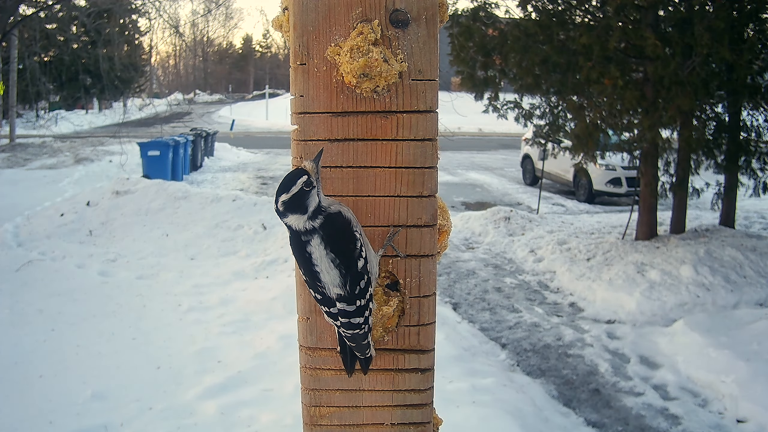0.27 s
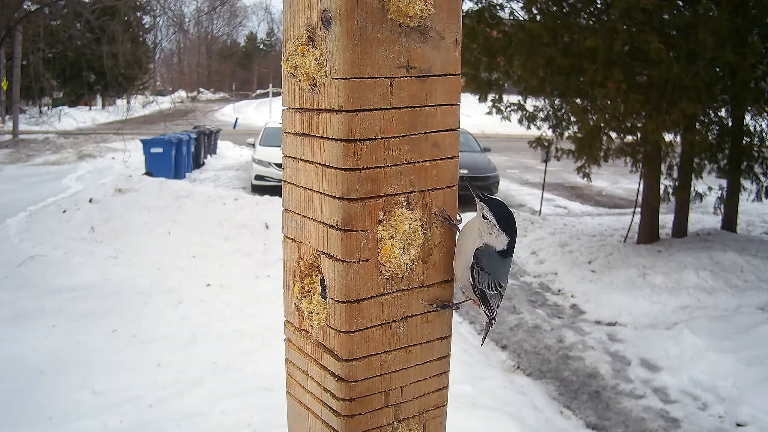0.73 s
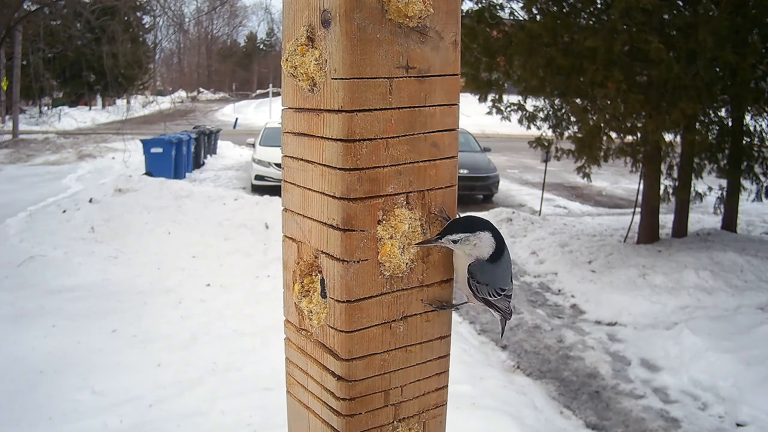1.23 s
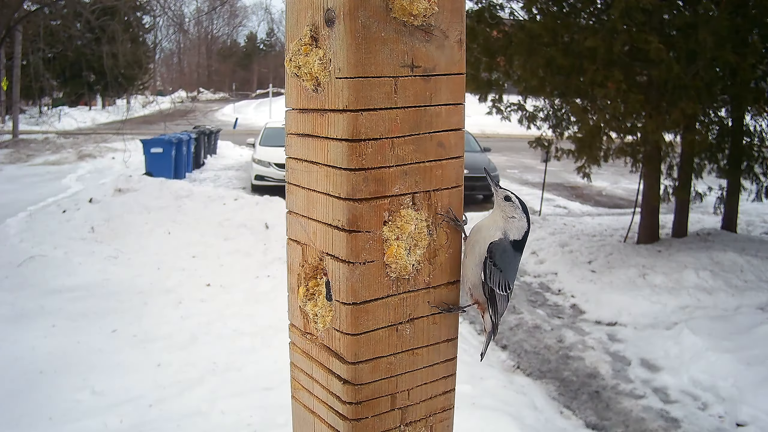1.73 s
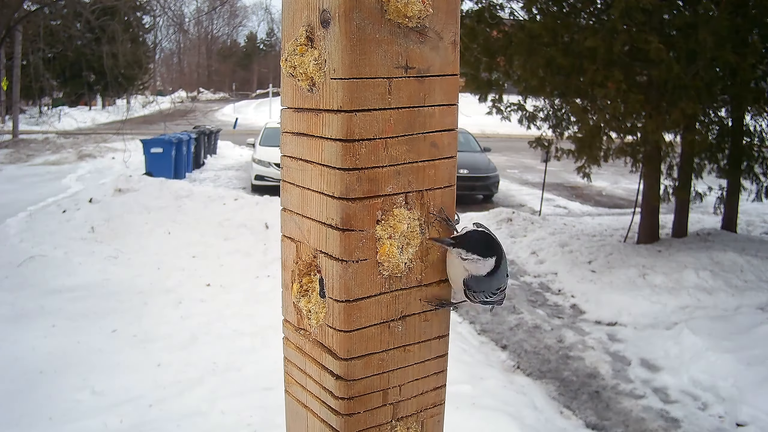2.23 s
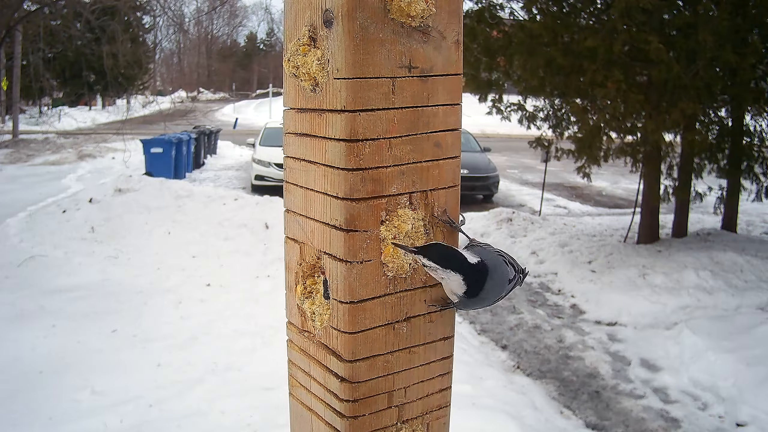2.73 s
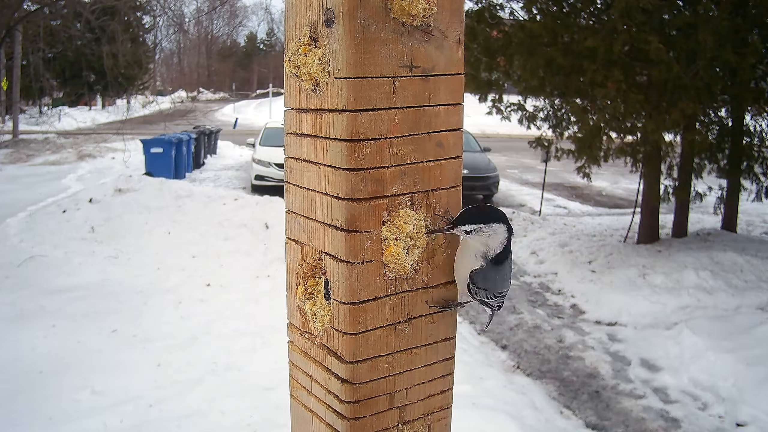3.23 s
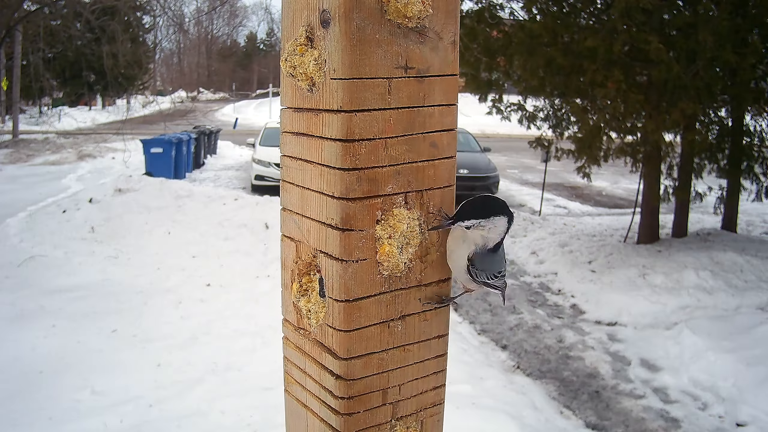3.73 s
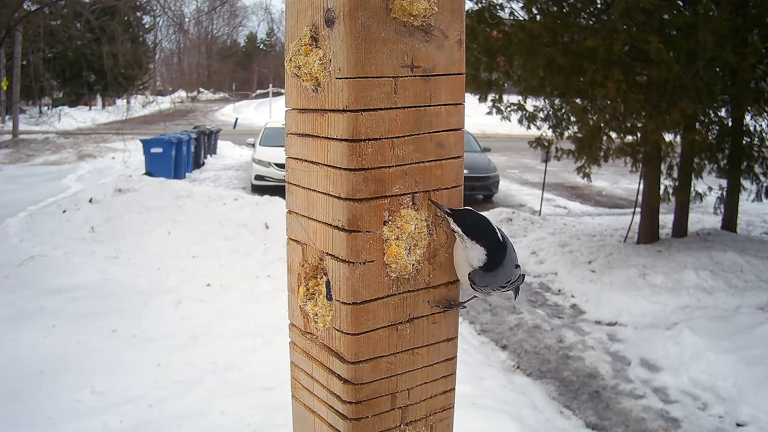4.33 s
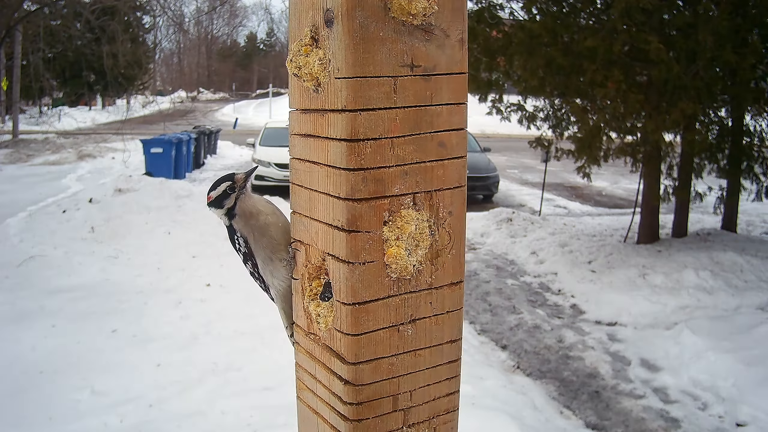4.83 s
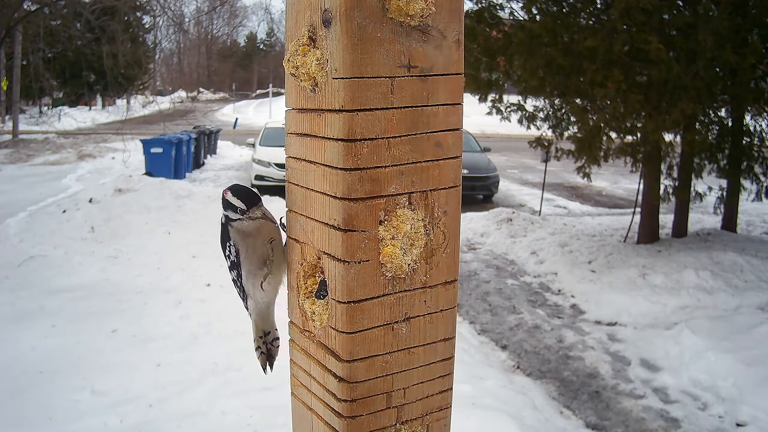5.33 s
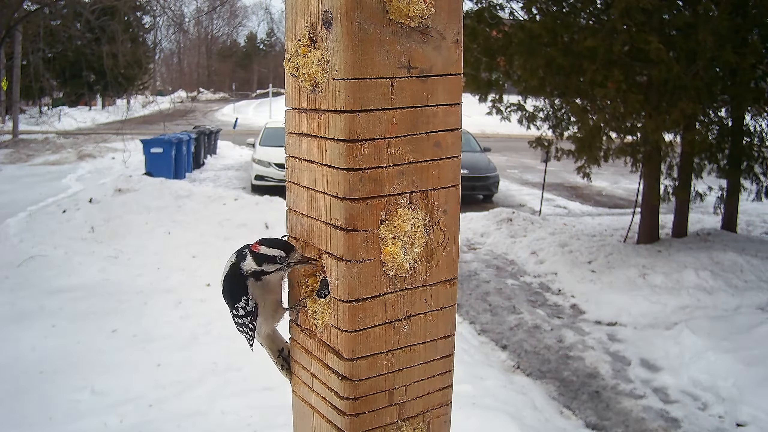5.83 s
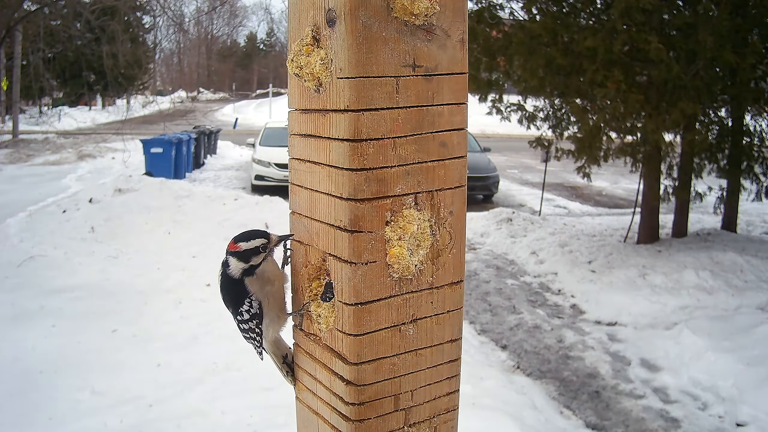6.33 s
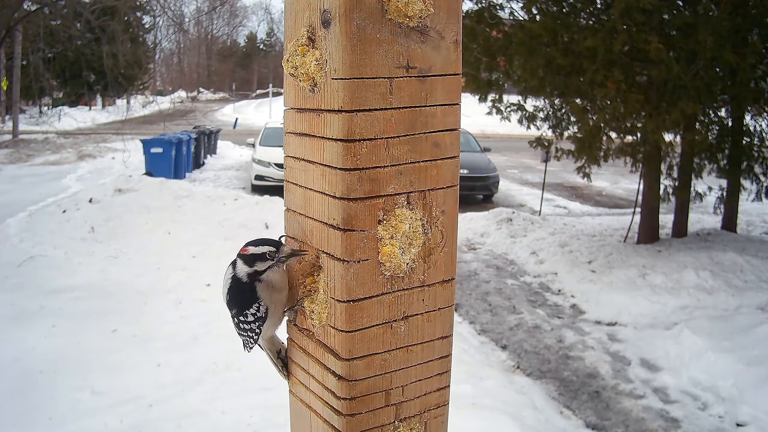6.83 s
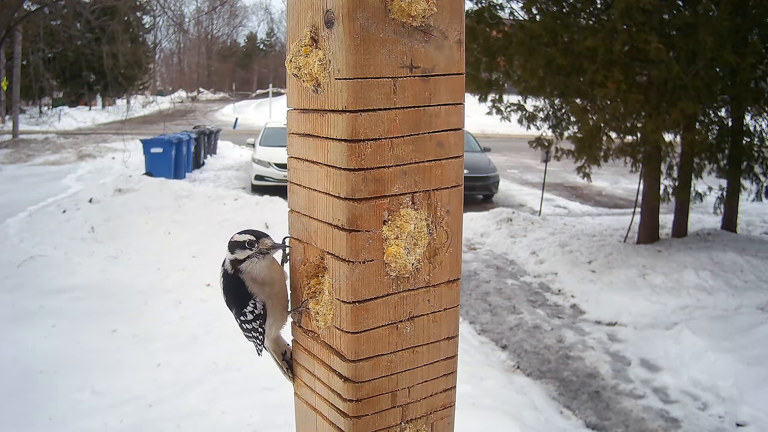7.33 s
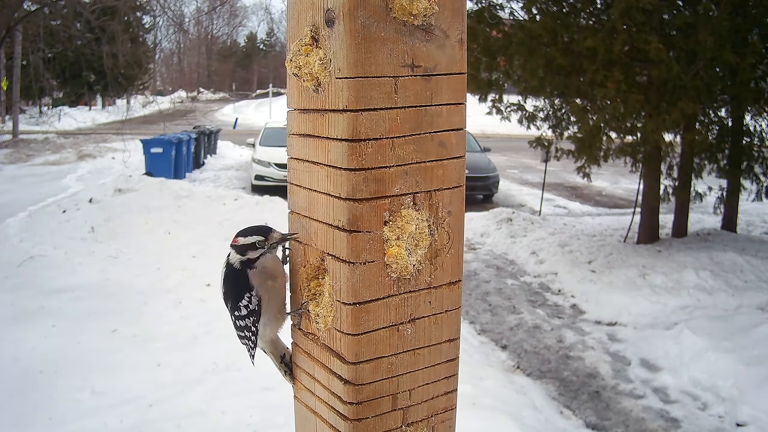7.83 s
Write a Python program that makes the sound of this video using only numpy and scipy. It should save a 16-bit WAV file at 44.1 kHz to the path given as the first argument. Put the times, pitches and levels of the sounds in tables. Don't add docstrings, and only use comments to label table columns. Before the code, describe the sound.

Near a wooden suet feeder, quiet hiss is cut by a momentary fade and abrupt restart. Neighbouring birds chip, call nasally, twitter and rasp faintly. Then one bird pecks: a weak tap, a pause, and a quick uneven run of hard hollow knocks with cracking attacks and short resonance. The feeder trembles softly. Claws scratch, a distant hoot and high chip sound, then suet tears sharply. Dry, close, centred sound.

```python
import sys
import numpy as np
from scipy import signal
from scipy.fft import rfft, irfft, next_fast_len
from scipy.io import wavfile

SR = 44100
rng = np.random.default_rng(int(sys.argv[2]) if len(sys.argv) > 2 else 0)


def inscribe(sig):
    pcm = np.round(np.clip(np.atleast_2d(sig).T, -1, 1) * 32767)
    wavfile.write(sys.argv[1], SR, pcm.astype(np.int16))


def gain_from_decibels(decibels):
    exponent = np.asarray(decibels, float) / 20
    return 10 ** exponent


N = 356813


def band(x, hz, width):
    return signal.lfilter(*signal.iirpeak(hz, hz / width, fs=SR), x)


def noise(hz, width, size=N):
    x = band(rng.standard_normal(size + 2000), hz, width)[2000:]
    return x / np.std(x)


def add(out, s, x):
    i = int(s * SR)
    out[i:i + len(x)] += x[:N - i]


def ring(modes, t, detune, lag=0, step=0):
    hz, db, t60, rise = (c[:, None] for c in np.transpose(modes))
    late = np.maximum(t - lag, 0)
    swell = (1 - np.exp(-late / rise)) ** 2
    fade = 1000 ** (-late / t60)
    tone = np.sin(2 * np.pi * hz * detune * (t - step))
    return np.sum(gain_from_decibels(db) * swell * fade * tone, axis=0)


# f/Hz, level/dB, t60/s, build-up/s
DEEP = [(520, -30.5, 0.082, 0.0021), (703, -16, 0.13, 0.0092), (815, 0, 0.12, .0026)]
# f/Hz, level/dB, t60/s, build-up/s
HOLLOW = [(939, 1.5, 0.069, 0.0018), (1020, -38, 0.056, .0015)]
# f/Hz, level/dB, t60/s, build-up/s
SIDE = [(1050, 2.5, 0.045, 0.0019), (1123, 2, 0.057, 0.0013), (1221, -2, 0.078, 0.0017),
        (1332, -1, 0.12, .002)]
# f/Hz, level/dB, t60/s, build-up/s
MIDDLE = [(1682, -7, 0.041, 0.0018), (1731, 5, 0.036, 0.00174), (1947, -10.5, 0.057, 0.0016)]
# f/Hz, level/dB, t60/s, build-up/s
KNOCK = [(2237, -1.5, 0.04, 0.0014), (2350, 4, 0.015, .0012), (2580, -4.5, 0.029, 0.0012)]
# f/Hz, level/dB, t60/s, build-up/s
EDGE = [(2830, 3, 0.023, 0.00032), (3100, -13, 0.039, 0.00083), (3350, -12.5, 0.022, 0.00087)]
# f/Hz, level/dB, t60/s, build-up/s
SHELL = [(4300, -8, 0.011, .0006), (5050, 1, 0.014, 0.00038), (5850, -3, 0.01, 0.00053)]
# f/Hz, level/dB, t60/s, build-up/s
HOOK = [(13100, -4, .035, .001), (13900, 5, .035, .001), (14300, 0, .045, .002), (15120, 2, 0.09, .004),
        (15260, -2, .07, .004)]
# f/Hz, level/dB, t60/s, build-up/s
CRACK = [(7330, 4.5, 0.0059, 0.00037), (7500, -31, .04, 0.0011), (8300, -4.5, 0.0073, 0.00037),
         (6000, -18, 0.0069, .0004)]
# level over force/dB, then dB gained per dB of middle, knock and crack
FOLLOWERS = [
    (-4, -0.08, 0.11, -0.18),
    (-22.5, -0.22, -0.084, -0.27),
    (-6.5, 0.44, 0.5, 0.12),
    (-14.5, 0.4, 0.58, 0.52),
    (-29.8, .15, .22, -.09),
    (-18, -.34, -0.0078, 0.65),
]
DEEP_LAG_S, HOLLOW_LAG_S = 0.0031, 0.0033
IN_STEP_S = 0.01
CREST_SOFT_S, CREST_HARD_S = 0.0028, 0.000824
HARD_DB, HARD_SPAN_DB = -3.5, 2.5
TAIL_DB, TAIL_T60_S, CLICK_T60_S = -19, 0.17, 0.014


def peck(force_db, mix):
    t = np.arange(int(0.3 * SR)) / SR
    middle_db, knock_db, crack_db = force_db + np.array(mix)
    levels = [force_db + db + np.dot(shares, mix) for db, *shares in FOLLOWERS]
    hollow_db, side_db, edge_db, shell_db, hook_db, click_db = levels
    softness = 1 / (1 + np.exp((mix[2] - HARD_DB) / HARD_SPAN_DB))
    crest_s = CREST_HARD_S + (CREST_SOFT_S - CREST_HARD_S) * softness
    detune = 1 + 0.003 * rng.standard_normal()

    blow = gain_from_decibels(force_db) * ring(DEEP, t, detune, DEEP_LAG_S, IN_STEP_S)
    blow += gain_from_decibels(hollow_db) * ring(HOLLOW, t, detune, HOLLOW_LAG_S, IN_STEP_S)
    blow += gain_from_decibels(side_db) * ring(SIDE, t, detune, HOLLOW_LAG_S)
    blow += gain_from_decibels(middle_db) * ring(MIDDLE, t, detune, 0, crest_s)
    blow += gain_from_decibels(knock_db) * ring(KNOCK, t, detune, 0, crest_s)
    blow += gain_from_decibels(edge_db) * ring(EDGE, t, detune, 0, crest_s)
    blow += gain_from_decibels(shell_db) * ring(SHELL, t, detune, 0, crest_s)
    blow += gain_from_decibels(hook_db) * ring(HOOK, t, detune, 0, crest_s)
    blow += gain_from_decibels(crack_db) * ring(CRACK, t, detune)
    blow += gain_from_decibels(click_db) * 1000 ** (-t / CLICK_T60_S) * noise(10000, 12000, size=len(t))
    woody = band(band(noise(1440, 1900, size=len(t)), 1700, 4200), 1740, 3800)
    return blow + gain_from_decibels(knock_db + TAIL_DB) * 1000 ** (-t / TAIL_T60_S) * woody


SMEAR_DB, SMEAR_S = -31.5, 0.034


def smear(blow):
    spread = np.hanning(int(2 * SMEAR_S * SR))
    spread = spread * rng.standard_normal(len(spread))
    return gain_from_decibels(SMEAR_DB) * np.convolve(blow[:160], spread) / 10


# t/s, force level/dB, then level over force/dB of the middle notes, bare-wood knock and crack
PECKS = [(2.797, -41, -14, -15.5, -10), (3.3803, -34, -23, 4.5, -5), (3.5614, -31.5, -6.5, -14, -6.5),
         (3.6958, -29.5, -6.5, -9.5, 0), (3.8478, -20.5, -7.5, -7.5, -7.5), (4.0148, -18.5, -3.5, 0, -8.5),
         (4.2384, -19, -1.5, 2, -27), (4.6430, -24, 2.5, 6, 10)]


def pecks():
    out = np.zeros(N)
    for s, force_db, *mix in PECKS:
        blow = peck(force_db, mix)
        add(out, s, blow)
        add(out, s - SMEAR_S, smear(blow))
    return out


def wobble(hz, width):
    z = signal.hilbert(band(noise(hz, width), hz, width), next_fast_len(N))[:N]
    x = (z / np.abs(z) ** 0.7).real
    return x / np.std(x)


# f/Hz, width/Hz, level/dB, share of the buzz, ring-out t60/s
MOUNT_LINES = [(25, 5, -17, .01, .2), (53.7, 3.2, .1, .01, 0.23), (77.8, 5, -12, .01, .2),
               (106, 4, -7, 0.31, .6), (164, 7.8, -0.6, .99, 0.24), (243, 13, -19, 0.85, .25),
               (288, 24, -18.5, .99, .25), (333, 7, -11, .99, .2)]
# t/s, length/s, level/dB, buzz level of the upper lines/dB
JOLTS = [(.82, 0.092, -80, -10), (0.998, .07, -77, -10), (1.19, .08, -77, -12), (1.35, .1, -81, -20),
         (2.82, .09, -65, -11.5), (2.95, .07, -65.5, -16), (3.12, 0.22, -78.5, -9), (3.38, 0.16, -61, -6.5),
         (3.555, 0.24, -59, -1.5), (3.82, .24, -56, -4.5), (4.12, .11, -61, -14), (4.255, 0.093, -63.5, -3),
         (4.374, .16, -61, -21), (4.643, 0.11, -60, -9), (4.98, .08, -84, -12), (5.73, .11, -67.5, -5.5),
         (5.87, .08, -71, -10), (6.02, .08, -71.5, -9), (6.2, .1, -75, -9), (6.59, .15, -66, -10.5),
         (6.947, .14, -74.5, -12), (7.154, 0.083, -74, -18), (7.34, .08, -77, -12),
         (7.658, 0.24, -68.5, -9), (8.0, .09, -77, -12)]
JOLT_RISE_S, REST_DB = 0.06, -93.5


def mount():
    t, slow = np.arange(N) / SR, np.arange(0, N / SR + 0.01, 0.002)
    start, length, jolt_db, buzz_db = (c[:, None] for c in np.transpose(JOLTS))
    rise = np.sin(np.pi / 2 * np.clip((slow - start) / JOLT_RISE_S + 0.37, 0, 1)) ** 2
    since_end = np.maximum(slow - start - length, 0)
    out = np.zeros(N)
    for hz, width, db, share, t60 in MOUNT_LINES:
        shape = rise * 1000 ** (-since_end / t60)
        shaking = np.sum((gain_from_decibels(jolt_db + share * buzz_db) * shape) ** 2, axis=0)
        gain = np.sqrt(gain_from_decibels(REST_DB) ** 2 + shaking)
        out += gain_from_decibels(db) * np.interp(t, slow, gain) * wobble(hz, width)
    return out


def scratch(out, s, db, hz, width, length):
    t = np.arange(-8000, 8000) / SR
    grain = band(noise(hz, width, size=len(t)), hz, 2 * width)
    add(out, s + t[0], gain_from_decibels(db - 3.5) * np.exp(-(t / length) ** 2 * 2) * grain)


# t/s, snap level/dB, squeak level/dB
TEARS = [(7.3478, -40, -52.5), (7.367, -60, -55), (7.3862, -43, -60), (7.3882, -32, -46)]


def suet():
    out = np.zeros(N)
    for s, snap_db, squeak_db in TEARS:
        scratch(out, s, snap_db, hz=11000, width=8000, length=0.00046)
        scratch(out, s, squeak_db, hz=3590, width=230, length=0.0086)
    return out


# t/s, peak level/dB, f/Hz
CLAWS = [(.736, -49, 9000), (.88, -52, 10000), (1.116, -50, 10500), (2.126, -50, 9000), (2.951, -49, 13500),
         (2.952, -51, 7000), (2.98, -51, 9500), (3.132, -50, 9000), (4.139, -49, 9000),
         (4.818, -48.5, 6500), (5.675, -52, 8500), (6.279, -48, 9500), (6.684, -47.5, 9000)]
# t/s, peak level/dB
SMALL_TICKS = [(2.131, -56), (3.134, -52), (3.383, -48), (3.564, -48), (5.678, -58)]


def claws():
    out = np.zeros(N)
    for s, db, hz in CLAWS:
        scratch(out, s, db, hz, width=0.39 * hz, length=0.0026)
    for s, db in SMALL_TICKS:
        scratch(out, s, db, hz=5000, width=600, length=0.0047)
    return out


# t/s, peak level/dB, f/Hz, width/Hz, length/s
RUSTLES = [(.787, -55, 4000, 5000, .03), (4.658, -54.5, 310, 90, .018), (6.26, -53, 5000, 5000, .035),
           (7.33, -59, 12000, 600, .01), (7.385, -51.5, 1500, 1500, .01),
           (7.3878, -33, 11000, 1800, 0.0032), (7.39, -53.5, 7000, 9000, .027), (7.401, -57, 800, 300, .02),
           (7.407, -53.5, 10500, 2500, .027), (7.663, -56, 6000, 9000, .02), (7.669, -60, 750, 300, .024)]


def rustles():
    out = np.zeros(N)
    for rustle in RUSTLES:
        scratch(out, *rustle)
    return out


# t/s, f/Hz
YANK_HZ = [(1.09, 735), (1.105, 759), (1.115, 803), (1.125, 846), (1.14, 815)]
# multiple of the pitch, rms level/dB, loudest at t/s, spread/s
YANK = [(1, -40.5, 1.128, .0053), (2, -33.5, 1.117, 0.008), (3, -36, 1.114, .0084),
        (4, -36.5, 1.111, .0084), (5, -47, 1.109, .005), (6, -51.5, 1.12, .006), (7, -50, 1.111, .005),
        (8, -53, 1.111, .005), (10, -69, 1.106, .006), (12, -65, 1.11, .0067)]
YANK_BREATH_DB, YANK_CUT = -54, 0.67


def yank():
    t = np.arange(N) / SR
    phase = 2 * np.pi * np.cumsum(np.interp(t, *np.transpose(YANK_HZ))) / SR

    def swell(s, spread):
        return np.exp(-((t - s) / np.where(t < s, spread, YANK_CUT * spread)) ** 2 / 2)

    tone = np.zeros(N)
    for k, db, s, spread in YANK:
        tone += gain_from_decibels(db + 3) * swell(s + 0.0017, spread) * np.sin(k * phase)
    breath = (1 + np.sin(phase)) * (noise(9000, 12000) + noise(2000, 2000))
    return tone + gain_from_decibels(YANK_BREATH_DB) * swell(1.116, 0.015) * breath


UPPER_VOICE = 1.155
UPPER_GROWTH = 1.4


def whistles(notes, waver, flutter, breath_db, upper_db):
    out, loudest_db = np.zeros(N), max(note[-1] for note in notes)
    for s, length, hz0, hz1, db in notes:
        u = np.linspace(0, 1, int(length * SR))
        pitch_shake, level_shake = [band(noise(106, 120, size=len(u)), 110, 160) for _ in range(2)]
        glide = hz0 + (hz1 - hz0) * np.sqrt(u)
        phase = 2 * np.pi * np.cumsum(glide * (1 + waver * pitch_shake)) / SR
        upper = gain_from_decibels(upper_db + UPPER_GROWTH * (db - loudest_db)) * np.sin(UPPER_VOICE * phase[-1] * u)
        tone = np.sin(phase) + upper
        breath = gain_from_decibels(breath_db) * noise(0.93 * hz0, 0.43 * hz0, size=len(u))
        add(out, s, gain_from_decibels(db + 2) * np.sin(np.pi * u) ** 1.3 * ((1 + flutter * level_shake) * tone + breath))
    return out


# t/s, length/s, first f/Hz, last f/Hz, rms level/dB
CHIPS = [(.768, .036, 7050, 7540, -40), (.804, 0.02, 7440, 7400, -55), (6.228, .065, 7200, 7640, -42.5),
         (6.282, .01, 7650, 7650, -50)]


def chips():
    return whistles(CHIPS, waver=0.005, flutter=0.62, breath_db=-21, upper_db=-14.5)


# t/s, length/s, first f/Hz, last f/Hz, rms level/dB
TWITTER = [(1.502, 0.037, 6450, 6150, -51.5), (1.575, .028, 6350, 6250, -50.5),
           (1.660, 0.029, 6330, 6290, -51), (1.735, 0.025, 6140, 6330, -56), (1.762, .03, 6300, 6250, -63),
           (1.815, .021, 6700, 6900, -59)]
# t/s, length/s, first f/Hz, last f/Hz, rms level/dB
TRAIL = [(1.77, .1, 5630, 5740, -67), (1.86, 0.032, 5700, 5780, -60), (1.872, .017, 4250, 4200, -63),
         (1.888, 0.021, 5850, 5680, -51), (1.92, .028, 5800, 5680, -64)]


def twitter():
    rough = whistles(TWITTER, waver=0.017, flutter=0.5, breath_db=-9, upper_db=-4.5)
    return rough + whistles(TRAIL, waver=0.004, flutter=0.47, breath_db=-14, upper_db=-16)


# t/s, length/s, first f/Hz, last f/Hz, rms level/dB
HOOT = [(4.945, 0.086, 690, 685, -59), (5.025, 0.072, 703, 713, -52)]


def hoot():
    return whistles(HOOT, waver=0, flutter=0, breath_db=-40, upper_db=-40)


# t/s, peak level/dB, f/Hz, length/s
RASP = [(2.046, -57, 3300, .062), (2.11, -58, 3050, .04), (2.199, -63.5, 3200, .12)]


def rasp():
    out = np.zeros(N)
    for s, db, hz, length in RASP:
        scratch(out, s, db, hz, width=850, length=length)
    return out


ECHO_T60_S = 0.12


def echoes(x, db):
    t = np.arange(int(0.25 * SR)) / SR
    hits = rng.standard_normal(len(t)) * (rng.random(len(t)) < 0.02)
    reply = hits * 1000 ** (-t / ECHO_T60_S) * (t > 0.003)
    return x + gain_from_decibels(db) * signal.fftconvolve(x, reply / np.linalg.norm(reply))[:N]


# f/Hz, width/Hz, level/dB
HUM = [(727, 24.5, -76.5), (690, 52, -77.5)]
HUM_WAVER_DB, HUM_WAVER_HZ = 3, 3.6


def hum():
    waver = gain_from_decibels(HUM_WAVER_DB * noise(HUM_WAVER_HZ, 2 * HUM_WAVER_HZ))
    return waver * sum(gain_from_decibels(db) * wobble(hz, width) for hz, width, db in HUM)


# f/Hz, level per Hz/dB
HISS = [(25, -17.5), (60, -29), (100, -23.5), (290, -12), (600, -8), (2000, -9), (9000, -13.5),
        (15500, -17.5)]
HISS_DB = -59
SPLICE_S = 0.7685


def hiss():
    t, hz = np.arange(N) / SR, np.maximum(np.fft.rfftfreq(N, 1 / SR), 1)
    at, db = np.transpose(HISS)
    colour = gain_from_decibels(np.interp(np.log(hz), np.log(at), db))
    x = irfft(rfft(rng.standard_normal(N)) * colour, N)
    traffic = gain_from_decibels(-69.5) * (t < SPLICE_S) * noise(1080, 460)
    whine = gain_from_decibels(-80) * (t > 4.8) * noise(8000, 150)
    return gain_from_decibels(HISS_DB) * x / np.std(x) + traffic + whine


PATCHES_PER_S, PATCH_S, PATCH_DB, PATCH_WIDTH_HZ = 4.5, 0.03, -74, 1500


def treble_patches():
    out, size = np.zeros(N), int(PATCH_S * SR)
    for when, where in rng.random((int(PATCHES_PER_S * N / SR), 2)):
        hz = 4400 + 9600 * where
        limits = [hz - PATCH_WIDTH_HZ / 2, hz + PATCH_WIDTH_HZ / 2]
        edges = signal.butter(6, limits, "band", fs=SR, output="sos")
        patch = signal.sosfilt(edges, rng.standard_normal(2 * size))[size:]
        add(out, when * N / SR, np.hanning(size) * patch)
    return gain_from_decibels(PATCH_DB) * np.sqrt(SR / 2 / PATCH_WIDTH_HZ) * out * np.array([[1], [-1]])


def scene():
    bird = pecks() + mount() + suet() + claws() + rustles()
    neighbours = echoes(yank(), db=-13.5) + echoes(chips(), db=-3) + echoes(twitter(), db=0) + hoot() + rasp()
    mono = bird + neighbours + hum() + hiss()
    return np.array([mono, mono])


def band_limit(x):
    return signal.sosfilt(signal.butter(12, 16310, fs=SR, output="sos"), x)


FADE_S, ENTER_S, TOP_HZ = 0.056, 0.0027, 15750


def record(dry):
    t = np.arange(N) / SR - SPLICE_S
    fade_out = np.clip(-t / FADE_S, 0, 1) ** 1.2
    gain = np.where(t < 0, fade_out, np.clip(t / ENTER_S, 0, 1))
    lowpass = signal.ellip(8, 0.3, 60, TOP_HZ, fs=SR, output="sos")
    mix = signal.sosfilt(lowpass, (dry + treble_patches()) * gain)
    return band_limit(mix)


dry = scene()
out = record(dry)
inscribe(out)
```